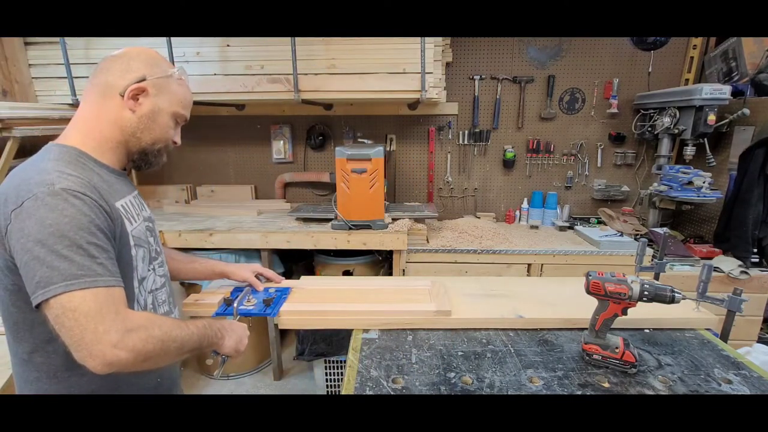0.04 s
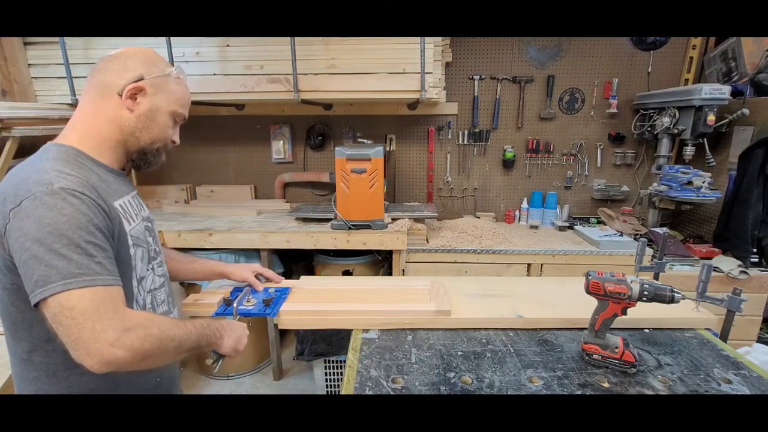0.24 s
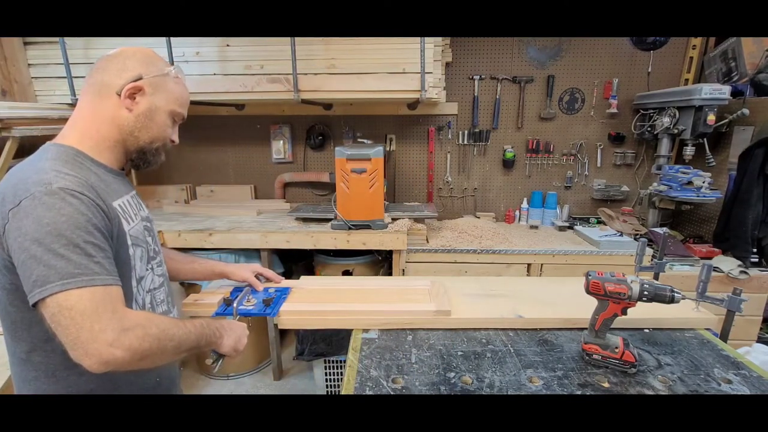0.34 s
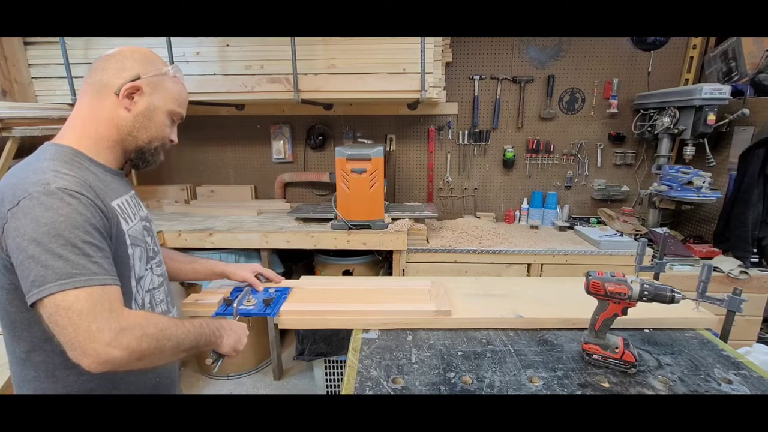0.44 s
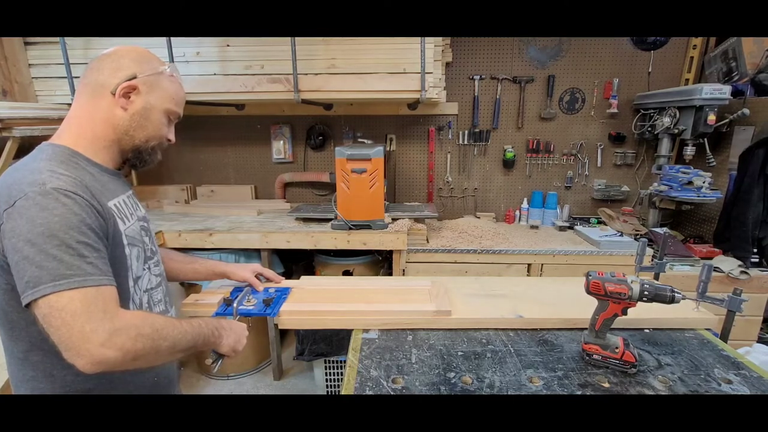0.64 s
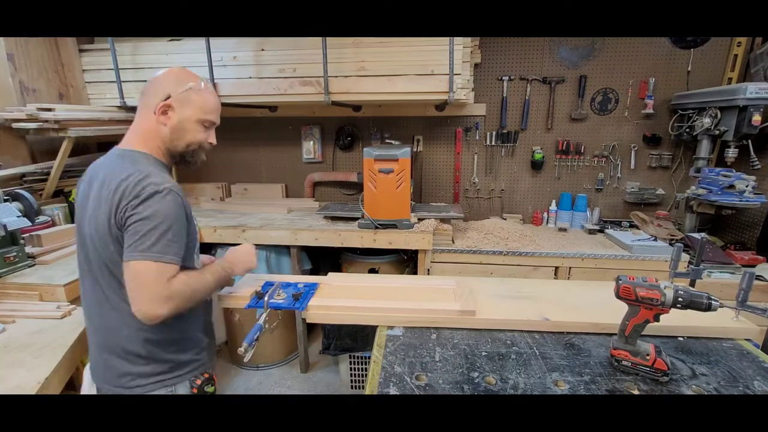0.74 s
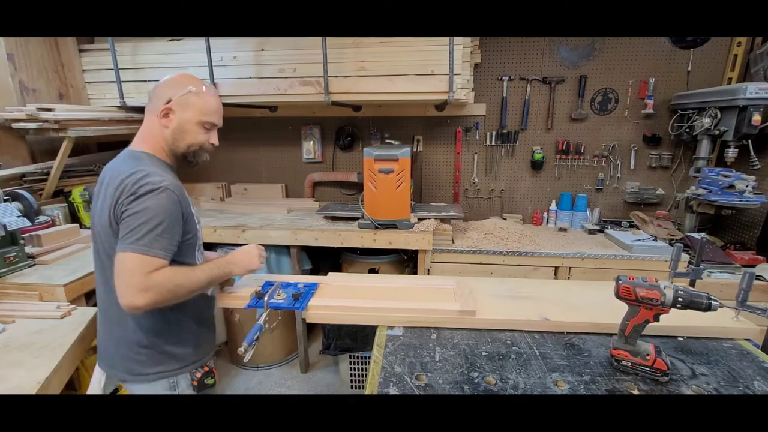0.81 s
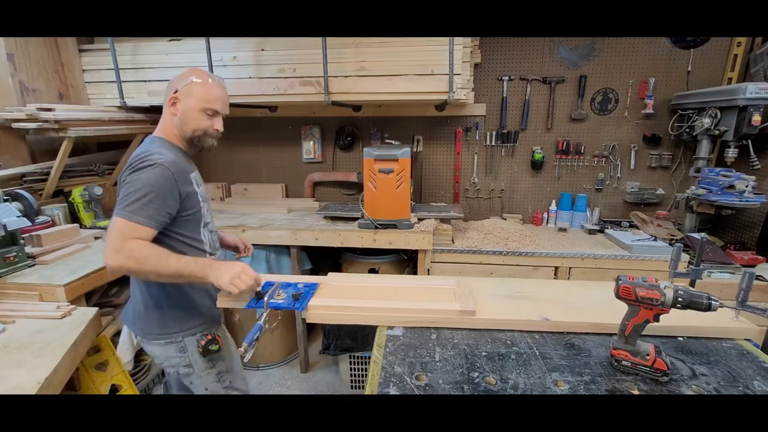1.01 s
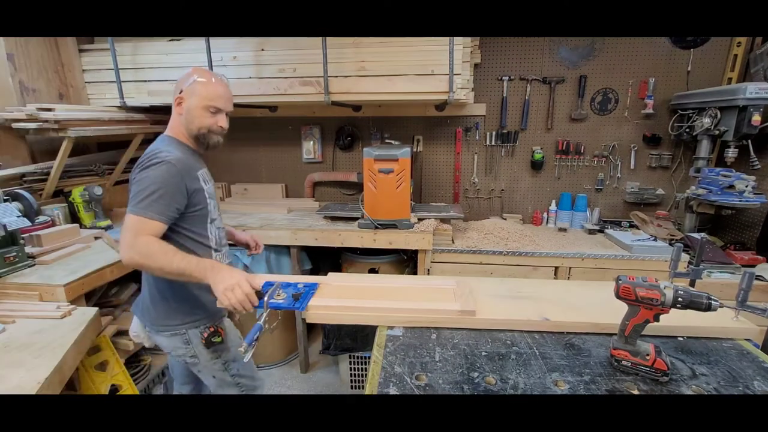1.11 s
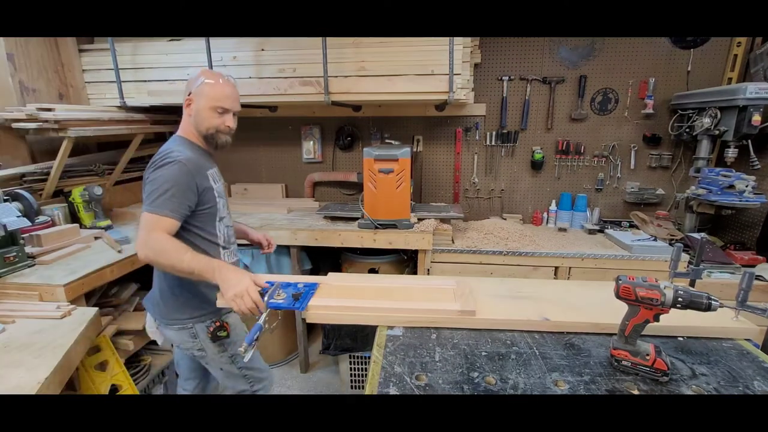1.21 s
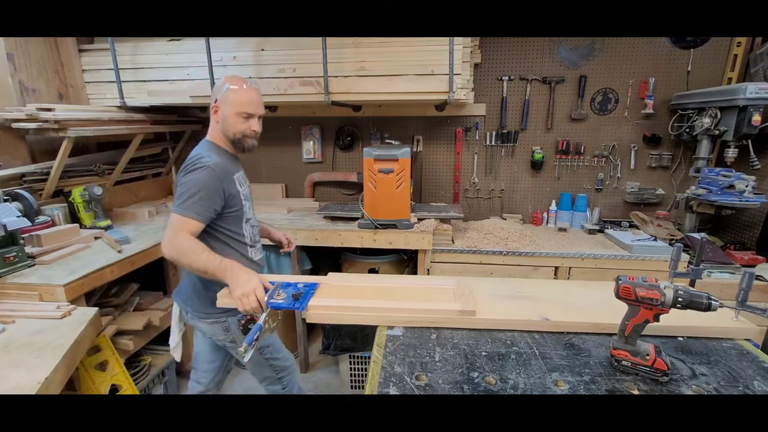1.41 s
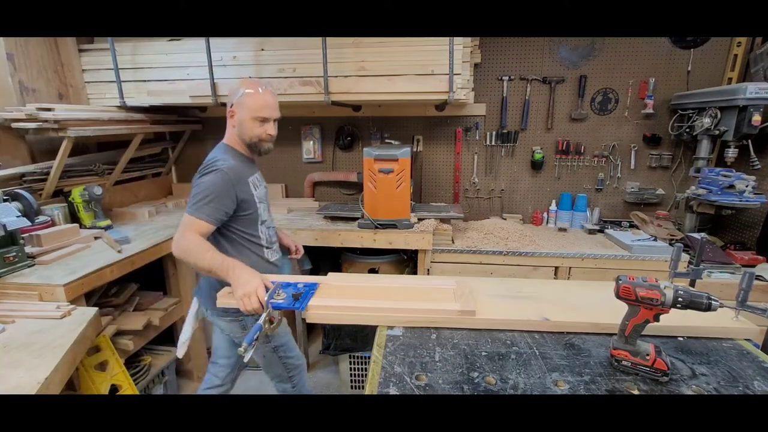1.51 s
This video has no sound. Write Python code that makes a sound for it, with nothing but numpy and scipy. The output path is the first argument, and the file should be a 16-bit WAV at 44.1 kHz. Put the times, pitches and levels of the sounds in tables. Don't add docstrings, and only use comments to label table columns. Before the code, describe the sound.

A locking clamp snaps shut with a hard, bright crack and short ring; quiet dull bumps on the bench, cloth rustle and a light tap follow in a small workshop, heard fairly close in stereo.

```python
import sys
import numpy as np
from scipy import signal
from scipy.fft import rfft, irfft
from scipy.io import wavfile
from scipy.ndimage import uniform_filter1d

SR = 44100
rng = np.random.default_rng(int(sys.argv[2]) if len(sys.argv) > 2 else 0)


def wav_record(signal):
    frames = np.transpose(np.atleast_2d(signal))
    bounded = np.clip(frames, -1, 1)
    quanta = np.round(bounded * 32767).astype(np.int16)
    wavfile.write(sys.argv[1], SR, quanta)


def ratio(d):
    e = np.asarray(d, float) / 20
    return 10 ** e


N = 68355


def rms_one(x):
    return x / np.sqrt(np.mean(x ** 2) + 1e-20)


def at_hz(points, hz):
    table_hz, values = np.array(points)[:, 0], np.array(points)[:, 1]
    return np.interp(np.log(hz), np.log(table_hz), values)


def drift(rate_hz):
    r = np.exp(-80 * np.pi * rate_hz / SR)
    steps = rng.standard_normal(N // 40 + 2002)
    slow = signal.lfilter([1], [1, -2 * r, r * r], steps)[2000:]
    return np.interp(np.arange(N) / 40, np.arange(len(slow)), rms_one(slow))


def bands(white, gain):
    # pitch_hz, likeness (-1 to 1)
    likeness = [(60, 0.67), (180, 1), (550, 0.079), (1650, -0.06), (4970, -0.16), (15000, 0.28)]
    out = 0
    edges = np.append(21 * 2 ** np.arange(0, 9.6, .5), 19000)
    for k, (low, high) in enumerate(zip(edges, edges[1:])):
        band_filter = signal.butter(2, [low, high], "band", fs=SR, output="sos")
        mid, side = signal.sosfilt(band_filter, white[k % 2])
        hz = np.sqrt(low * high)
        alike = np.clip(at_hz(likeness, hz), -1, 1)
        stereo = np.sqrt(1 + alike) * mid + np.sqrt(1 - alike) * side * [[1], [-1]]
        out = out + gain(hz) * stereo
    return out


def struck(times, levels_db, modes, spread_db, late_cycles=0):
    out = np.zeros(N)
    chance = rng.normal(0, 1, (len(times), len(modes)))
    for k, (hz, db, t60) in enumerate(modes):
        clicks = np.zeros(N) + 1e-18
        starts = ((times + late_cycles / hz) * SR).astype(int)
        clicks[starts] = ratio(levels_db[:, k] + db + spread_db * chance[:, k]) * (-1) ** k
        r = ratio(-60 / (t60 * SR))
        w = 2 * np.pi * hz / SR
        out += signal.lfilter([0, np.sin(w)], [1, -2 * r * np.cos(w), r * r], clicks)
    return out


def clamp():
    # start_s, peak_db, brightness_db, pan_db (plus is left)
    blows = [
        (0.2405, -6.5, 7, 0),
        (1.328, -40, -26, -3.5),
        (1.336, -40, -29, -0.5),
    ]
    # pitch_hz, level_db, t60_s (time to fall 60 dB)
    clamp_modes = [(118, -18.5, .1), (186, -14, 0.068), (370, -12, .05), (673, -18, 0.051),
                   (840, -13.5, 0.024), (939.7, -11.5, 0.036), (1113, -8.5, 0.054), (1312.3, 0.5, 0.062),
                   (1445, -7, 0.06), (1682, -12.5, 0.085), (2154, -13.5, 0.047), (2766, -14, 0.047),
                   (6107, -1, .025)]
    # pitch_hz, level_db, t60_s
    handle_modes = [(1378, 1.5, 0.15), (1350, -9, .36), (355.3, -15.5, 0.055), (107.2, -22, 0.2)]
    # pitch_hz, level_db (per Hz)
    crack_colour = [(880, -28.5), (1500, 11), (3480, -13.5), (6310, -6.5), (9850, -18.5), (11200, -27),
                    (14200, -24.5), (16000, -35.5)]
    late_cycles = 1.5
    crack_hold_s, crack_rise_s, crack_t60_s = .0025, 0.001, 0.0028
    crack_low_hz, crack_pan_db, crack_room_db = 2650, 4, 12.5
    slide_start_s, slide_db, slide_s = .223, -38.5, 0.018

    s, db, bright_db, pan_db = np.transpose(blows)
    snap_s, snap_db = s[0], db[0]
    octaves = np.clip(np.log2(np.array(clamp_modes)[:, 0] / 1400), 0, 2) / 2
    ring_db = db[:, None] - 10 + bright_db[:, None] * octaves
    rings = struck(s, ring_db, clamp_modes, spread_db=3.5, late_cycles=late_cycles)
    handle_db = db[:, None] - 6 + np.zeros(len(handle_modes))
    handles = struck(s, handle_db, handle_modes, spread_db=2.0, late_cycles=late_cycles)

    t = np.arange(N) / SR
    age = np.maximum(t - snap_s, 0)
    fall_db = 60 * np.maximum(age - crack_hold_s, 0) / crack_t60_s
    envelope = ratio(snap_db - fall_db) * (1 - np.exp(-age / crack_rise_s))
    sliding = (t > slide_start_s) * (t < snap_s)
    envelope += sliding * ratio(slide_db - 20 * np.maximum(snap_s - t, 0) / slide_s)

    hz = np.maximum(np.arange(N // 2 + 1) * SR / N, 20)
    colour = ratio(at_hz(crack_colour, hz)) / (1 + (crack_low_hz / hz) ** 4)
    noise = irfft(rfft(rng.standard_normal((2, N))) * colour, N)
    crack = rms_one(noise) * envelope * ratio([[crack_pan_db / 2], [-crack_pan_db / 2]])
    click = irfft(colour * np.exp(-2j * np.pi * hz * (snap_s + crack_hold_s)), N)
    click = ratio(snap_db + crack_room_db) * click / np.linalg.norm(click)
    pan = ratio(np.interp(t, s, pan_db) * [[.5], [-.5]])
    return (rings + handles) * pan + crack, rings + click


def bench():
    # start_s, peak_db, pitch_hz, t60_s
    bumps_table = [(0.005, -66.5, 445, 0.14), (0.205, -53, 772, 0.029), (0.491, -61, 340, 0.1),
                   (0.565, -60, 1600, .08), (0.583, -60.5, 1035, 0.24), (0.605, -50.5, 662, 0.044),
                   (0.625, -62.5, 361, 0.093), (0.768, -57, 248, 0.061), (0.787, -49.5, 255, 0.044),
                   (0.801, -52, 273, 0.067), (0.868, -47.5, 358, 0.081), (0.871, -49.5, 236, 0.073),
                   (0.899, -62, 246, 0.11), (0.911, -56, 190, 0.12), (0.995, -60, 445, 0.36),
                   (1.045, -57.5, 655.4, 0.069), (1.198, -54, 849, 0.061), (1.207, -58, 959, .09),
                   (1.214, -65.5, 364, 0.13), (1.257, -61.5, 5120, 0.099), (1.26, -52.5, 87, 0.32),
                   (1.329, -41, 640, 0.054), (1.334, -47, 387, 0.12), (1.336, -55, 870, 0.05),
                   (1.335, -55.5, 245, .25), (1.337, -61, 2120, 0.04), (1.436, -55, 250, 0.19),
                   (1.444, -42.5, 388, 0.032), (1.501, -52, 248.6, .2), (1.507, -52, 89.4, .2)]
    # pitch_hz, level_db, t60_s
    bench_modes = [(88, -6, 0.15), (190, -6.5, 0.12), (255, -1, 0.11), (352, -7.5, 0.037),
                   (445, -7.5, 0.18), (640, -7.5, .06)]
    bench_share_db = -18
    own = 0
    for start, level_db, pitch, t60 in bumps_table:
        own = own + struck(np.array([start]), np.array([[level_db]]), [(pitch, 0, t60)], 0)
    s, db, _, _ = np.transpose(bumps_table)
    shared_db = db[:, None] + bench_share_db + np.zeros(len(bench_modes))
    bumps = own + struck(s, shared_db, bench_modes, spread_db=6.5)
    return np.convolve(bumps, np.ones(3) / 3, "same")


def rustle():
    # (each per 20 dB; rise_s is at least .01, fall_s at least .13)
    swells = [(0.01, -62.5, .1, 0.21), (0.57, -61, -0.05, 0.1), (0.63, -62, 1.1, -3.2),
              (0.861, -63, -0.46, 0.8), (0.931, -58, 0.34, 0.36), (1.009, -60.5, 0.02, 0.1),
              (1.168, -65.5, -0.5, 1.8), (1.255, -63, -0.12, -0.7), (1.351, -60.5, -0.13, -1.9),
              (1.502, -53, 0.2247, .2)]
    # pitch_hz, level_db (per Hz)
    cloth_colour = [(200, -25), (350, -2), (1170, -7), (3000, -11.5), (6500, -19), (9000, -32),
                    (14500, -26), (16000, -39)]
    grains_per_s, grain_spread_db = 2000, 1.5
    between_db = -75
    top_db = -1

    t = np.arange(N) / SR
    effort = ratio(between_db)
    for s, db, rise, fall in swells:
        drop_db = 20 * np.maximum((s - t) / max(rise, .01), (t - s) / max(fall, .13))
        effort = np.hypot(effort, ratio(db - drop_db))

    shape = (2, 2, N)
    present = rng.random(shape) < grains_per_s / SR
    sizes = ratio(grain_spread_db * rng.exponential(1, shape))
    grains = present * sizes * rng.choice([-1, 1], shape)
    together = drift(20)

    def gain(hz):
        return ratio(at_hz(cloth_colour, hz) + 1.4 * together + 1.0 * drift(8.3))

    cloth = bands(grains + .2 * rng.standard_normal(shape), gain)
    dull = signal.sosfilt(signal.butter(8, 7600, fs=SR, output="sos"), cloth)
    return effort * rms_one(dull + ratio(top_db) * (cloth - dull))


def room(x):
    # pitch_hz, t60_s
    room_t60 = [(80, 0.45), (210, 0.32), (560, 0.27), (1470, 0.29), (3880, 0.25), (10200, 0.21)]
    # pitch_hz, level_db
    room_colour = [(60, -4), (200, 2), (600, 1), (1400, -3), (3000, -1.5), (6000, -8), (9000, -11.5),
                   (14000, -3)]
    room_db, rise_s = 6.5, 0.002
    size = SR // 2
    t = np.arange(size) / SR

    def gain(hz):
        return ratio(at_hz(room_colour, hz) - 60 * t / at_hz(room_t60, hz))

    answer = bands(rng.standard_normal((2, 2, size)), gain)
    answer = answer * (1 - np.exp(-(t / rise_s) ** 2)) * ratio(room_db - 28.5)
    return signal.fftconvolve(answer, x[None], axes=1)[:, :N]


def hum():
    # pitch_hz, level_db (per Hz)
    hum_colour = [(18, -38.5), (30, -10.5), (95, -0.5), (295, -32), (5170, -46), (5590, -39), (6380, -50),
                  (13300, -43), (16000, -43)]
    hum_db = -64

    def gain(hz):
        return ratio(at_hz(hum_colour, hz) + 0.5 * drift(2.7))

    return ratio(hum_db) * rms_one(bands(rng.standard_normal((2, 2, N)), gain))


def scene():
    right_lag_s, bump_room_db, low_cut_hz = .00035, -9.5, 60
    near, feed = clamp()
    bumps = bench()
    near = near + bumps
    near[1] = np.roll(near[1], round(right_lag_s * SR))
    blows_in_room = near + room(feed + ratio(bump_room_db) * bumps)
    low_cut = signal.butter(4, low_cut_hz, "high", fs=SR, output="sos")
    return signal.sosfilt(low_cut, blows_in_room) + rustle() + hum()


def low_pass(x):
    return signal.sosfilt(signal.butter(12, 16670, fs=SR, output="sos"), x)


def record(dry):
    gate_db, gate_depth_db, gate_s = -66, 6.5, 0.02
    notch_hz, notch_width_hz, notch_share = 11470, 900, 0.69
    cutoff_hz = 16600
    power = uniform_filter1d(np.mean(dry ** 2, axis=0), int(gate_s * SR))
    level_db = 10 * np.log10(power + 1e-12)
    x = dry * ratio(-gate_depth_db / (1 + ratio(level_db - gate_db)))
    b, a = signal.iirpeak(notch_hz, notch_hz / notch_width_hz, fs=SR)
    x = x - notch_share * signal.lfilter(b, a, x)
    top_cut = signal.cheby2(12, 60, cutoff_hz, fs=SR, output="sos")
    mix = signal.sosfilt(top_cut, np.tanh(x))
    return low_pass(mix)


dry = scene()
out = record(dry)
wav_record(out)
```